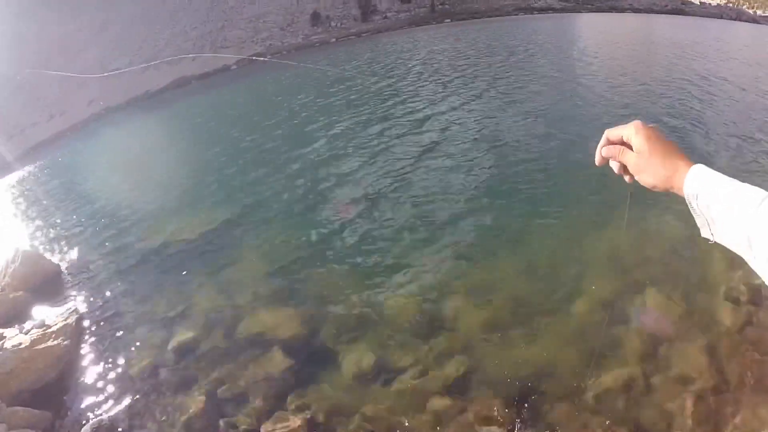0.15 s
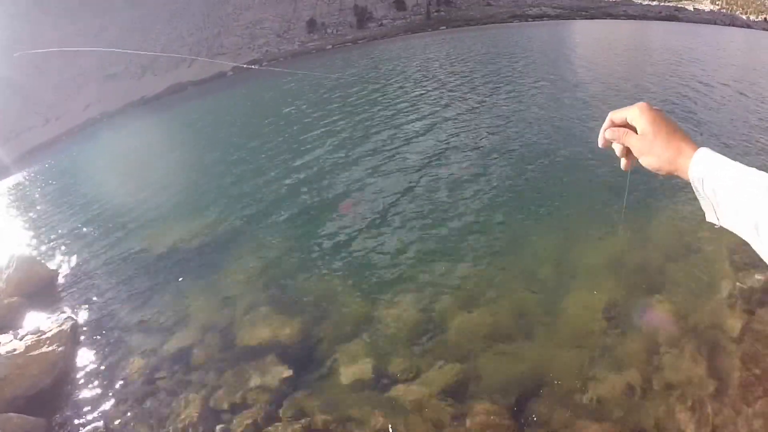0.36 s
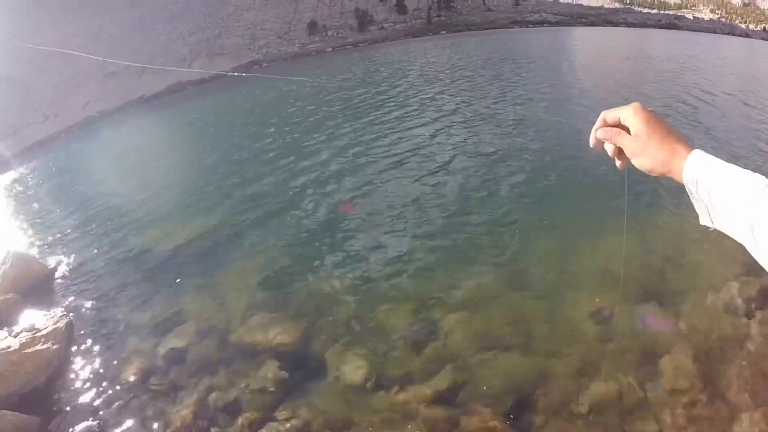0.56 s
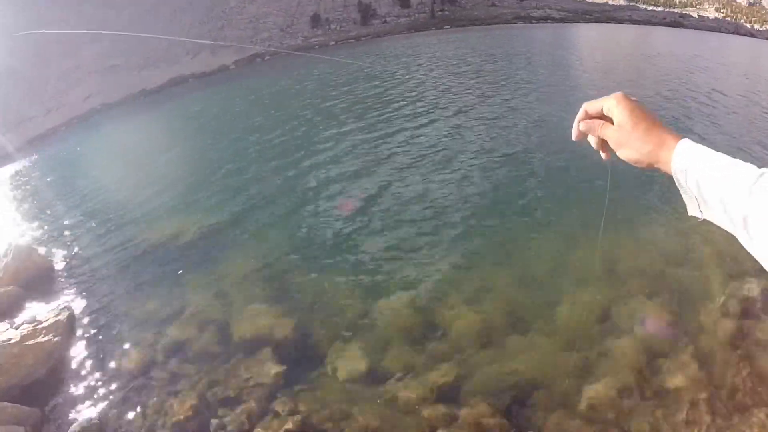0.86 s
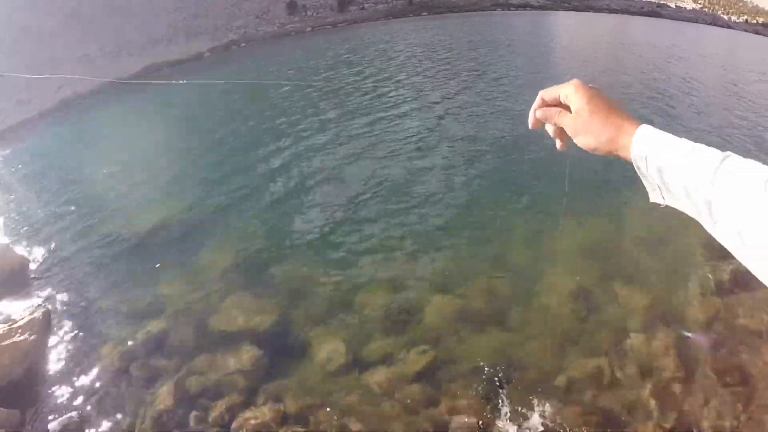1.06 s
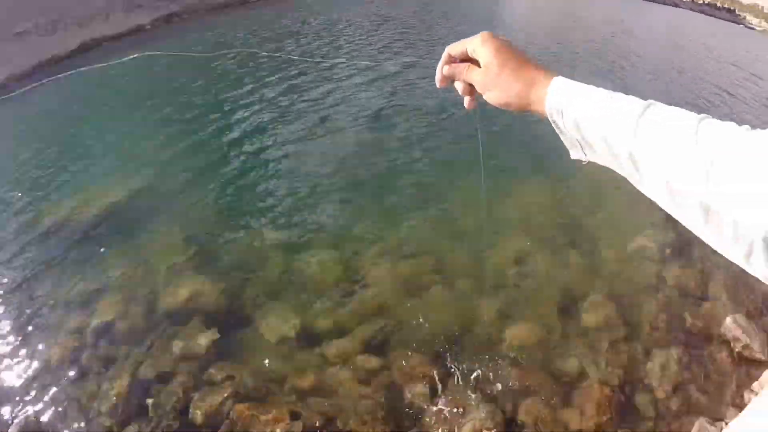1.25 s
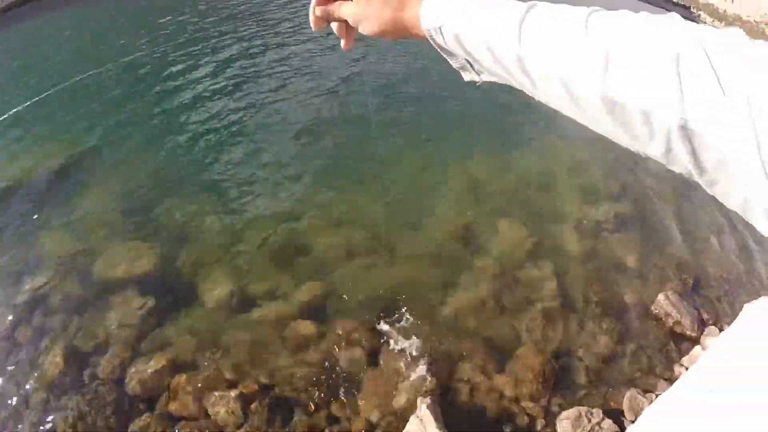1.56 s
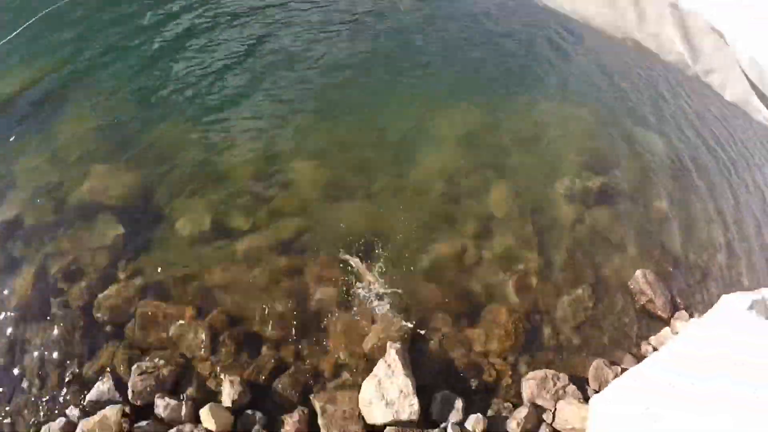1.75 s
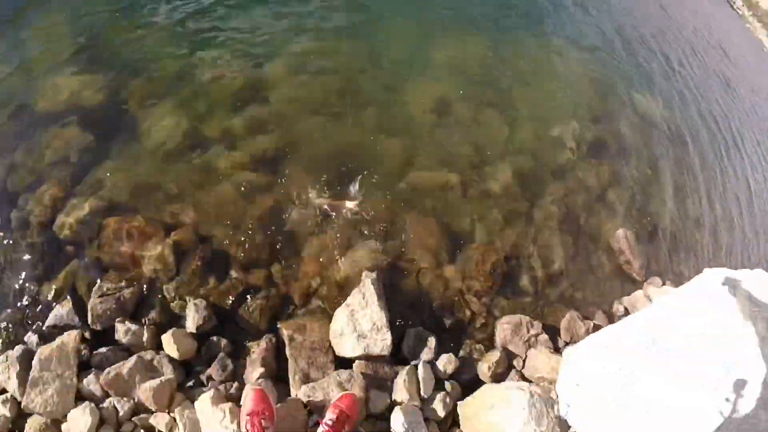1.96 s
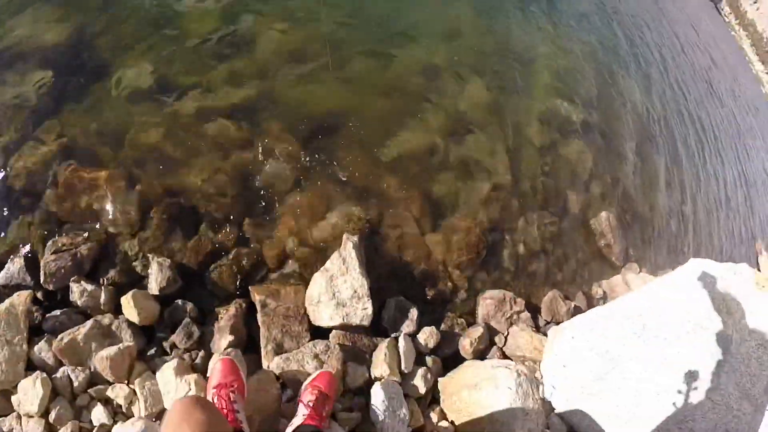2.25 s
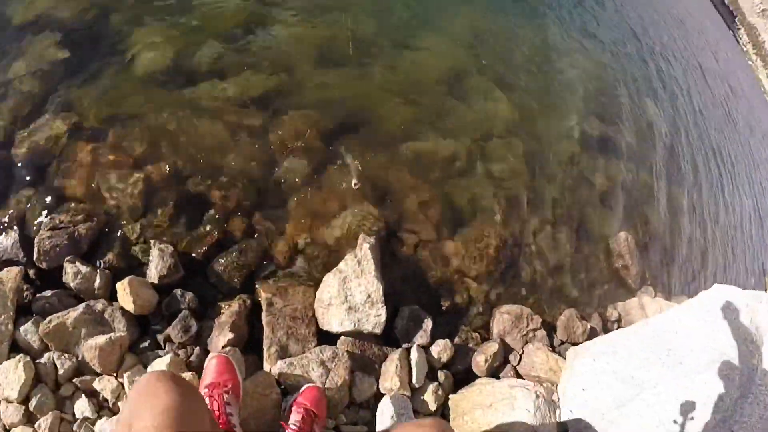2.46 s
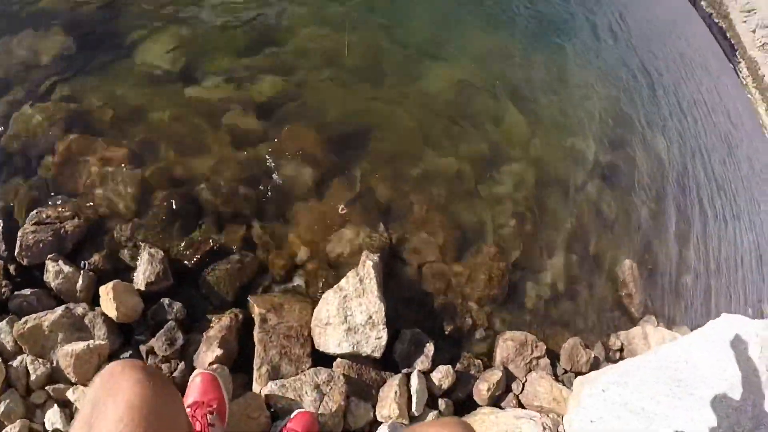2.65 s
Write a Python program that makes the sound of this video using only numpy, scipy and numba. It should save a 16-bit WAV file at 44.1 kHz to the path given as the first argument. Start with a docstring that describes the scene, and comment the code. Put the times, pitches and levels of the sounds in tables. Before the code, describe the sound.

A hooked fish thrashes in stony lake shallows. Until about 0.9 s, faint sloshing mixes with buzzing and small ticks from the camera housing. A burst of spray comes near 1 s, then sharp wet slaps cluster at 1.5-1.7 s, another at 1.9 s with low bubble gulps to 2.0 s. Smaller splashes and plops follow from 2.3 to 2.75 s. Gusty wind rumbles low on the microphone.

```python
"""A hooked fish thrashes in stony shallows a metre or two below a small camera with one microphone.
Slaps are ragged bursts of noise with a strong note each; bubbles are fading, gliding tones.
Spray and a wash of water mix noise with thousands of tiny droplet tones.
Behind them wind rumbles on the camera's port as filtered noise, and the housing buzzes and ticks
as rough noise through a few resonances."""
import sys
import numpy as np
from scipy import signal
from scipy.fft import rfft, irfft
from scipy.io import wavfile
from scipy.ndimage import uniform_filter1d
from numba import njit

SR = 44100
rng = np.random.default_rng(int(sys.argv[2]) if len(sys.argv) > 2 else 0)


def generate_wav(signal):
    """Clip the signal to [-1, 1] and save it as 16-bit WAV at the path in sys.argv[1]."""
    frames = np.transpose(np.atleast_2d(signal))
    scaled = np.clip(frames, -1, 1) * 32767
    pcm = np.round(scaled).astype(np.int16)
    wavfile.write(sys.argv[1], SR, pcm)


def magnitude_from_level(level_db):
    """Linear magnitude for a level in decibels (20 dB per decade)."""
    exponent = np.asarray(level_db, float) / 20
    return 10 ** exponent


N = 123479  # length in samples
T = np.arange(N) / SR  # time of every sample in seconds
F = np.arange(8193) * SR / 16384 + 1  # frequencies in Hz at which filters are drawn

# The changing strength of buzz, spray and wash over the whole scene;
# the shares of buzz and spray are set apart from it.
# Each row: time in seconds, treble level in dB, level of the middle relative to the treble in dB.
WATER_LEVELS = [(0, -54.5, 10.5), (0.12, -58.5, 4), (0.21, -59.5, 1), (0.33, -56.5, 6), (0.4, -47.5, 1.5),
                (0.5, -56, 8), (0.6, -59.5, 3.5), (0.83, -52, 4), (0.96, -41, -11.5), (1.04, -50.5, -12),
                (1.11, -44, -4), (1.19, -53, 1.5), (1.36, -56.5, -5.5), (1.53, -47, 5), (1.6, -45.5, 1),
                (1.72, -49.5, -7), (1.94, -46.5, -3), (2.13, -58, 3), (2.24, -57, -2), (2.34, -45.5, 11.5),
                (2.49, -46.5, 1), (2.515, -51.5, -3.5), (2.635, -56.5, 0.5), (2.67, -54, 9.5),
                (2.8, -58.5, 6.5)]
# The tone colour of spray. Each row: frequency in Hz, relative level in dB per Hz.
SPRAY_COLOUR = [(650, -68), (1100, -4), (2120, -1), (3140, -5.5), (3700, -2.5), (4270, -7), (5250, -7),
                (10500, -32), (15000, -20.5)]
# The spray takes over from the buzz as the fish breaks the surface: start and end in seconds.
SURFACING = 0.82, 1.29


def curve(rows, column):
    """Reads one column of a table at every sample, with straight lines between the rows."""
    table = np.array(rows, float)
    return np.interp(T, table[:, 0], table[:, column])


def unit(x):
    """Scales a sound to rms 1."""
    return x / np.sqrt(np.mean(x ** 2))


def colour(x, gain):
    """Filters a sound with the gain drawn over F, without any sound ahead of its cause."""
    cepstrum = irfft(np.log(gain + 1e-7))
    half = len(cepstrum) // 2
    # folding the second half onto the first gives the filter with the least delay
    cepstrum[1:half] *= 2
    cepstrum[half + 1:] = 0
    response = irfft(np.exp(rfft(cepstrum)))[:half]
    return signal.fftconvolve(x, response)[:N]


def shape(points):
    """Gain over F of a spectrum given as rows of Hz and dB."""
    table = np.array(points, float)
    return magnitude_from_level(np.interp(np.log(F), np.log(table[:, 0]), table[:, 1], left=-90, right=-90))


def peak(hz, width):
    """Gain over F of one resonance, with its width in Hz."""
    return 1 / np.sqrt(1 + ((F ** 2 - hz ** 2) / (F * width)) ** 2)


def walk(rate):
    """A wandering random level of rms 1: new values at this rate in Hz, smoothed twice."""
    hold = int(SR / rate)
    steps = rng.standard_normal(2000)[np.arange(N) // hold]
    return unit(uniform_filter1d(uniform_filter1d(steps, hold), hold))


def burst(peak_s, t60, rise_s):
    """Loudness of one hit: a quick rise to 1 at peak_s, then a fade by 60 dB in t60 seconds."""
    since = np.maximum(T - peak_s + rise_s, 0)
    rise = np.minimum(since / rise_s, 1) ** 2
    fade = np.exp(-np.log(1000) * np.maximum(since - rise_s, 0) / max(t60, .004))
    return rise * fade


@njit
def ring(at, hz, cycles, size, glide):
    """Sum of short fading tones that glide upward."""
    out = np.zeros(N)
    for k in range(len(at)):
        n = cycles[k] * SR / hz[k]
        step, phase = 2 * np.pi * hz[k] / SR, 0.
        for j in range(min(int(3 * n), N - at[k])):
            phase += step * (1 + glide * j / n)
            out[at[k] + j] += size[k] * np.sin(phase) * np.exp(-2 * j / n) * min(j * 5 / n, 1.)
    return out


def drops(lo_hz, hi_hz, cycles, spread_db, count):
    """Tiny ringing tones of random time, pitch, size and length; together about as even as white noise."""
    when, pitch, luck, length = rng.random((count, 4)).T
    hz = lo_hz * (hi_hz / lo_hz) ** pitch
    size = hz * magnitude_from_level(-spread_db * np.log(luck + .015))
    return unit(ring((when * N).astype(np.int64), hz, cycles * (.5 + length), size, 0.15))


def hits(rows, broad, rise_s, t60, q, note_db):
    """Short bursts of a broad noise, each with one strong note made by a narrow filter."""
    note, out = rng.standard_normal(N), np.zeros(N)
    for start_s, db, hz in rows:
        span = slice(max(int((start_s - .02) * SR), 0), int((start_s + .15) * SR))
        env = burst(start_s + rise_s, t60, rise_s)[span]
        tone = unit(signal.lfilter(*signal.iirpeak(hz, q, fs=SR), note[span]))
        hit = env * (broad[span] + magnitude_from_level(note_db) * tone)
        even = np.sqrt(np.sum(env ** 2) / np.sum(hit ** 2))
        out[span] += magnitude_from_level(db - 9) * hit * even  # 9 dB: noise peaks stand above its rms
    return out


def wind():
    """Eddies on the port: a deep and a fluttering upper rumble, both held close to the gust's strength."""
    # The gusts. Each row: time in seconds, level of the deep rumble in dB,
    # level of the upper rumble relative to the deep one in dB.
    gusts = [(0, -44.5, 7.5), (0.15, -43.5, -20.5), (0.35, -36, -9.5), (0.53, -30, -10.5), (0.68, -36, 0),
             (0.83, -40, -3.5), (0.96, -26, -2), (1.05, -35.5, -0.3), (1.2, -29, -10.5), (1.6, -33, -2),
             (1.88, -31.5, 2), (2.1, -35, -3), (2.33, -28.5, 2.5), (2.45, -34, -4), (2.56, -39.5, 6.5),
             (2.62, -56.5, 12.5), (2.68, -37.5, -11.5), (2.8, -50.5, 19)]
    # Tone colours of the two rumbles. Each row: frequency in Hz, relative level in dB per Hz.
    deep_colour = [(11, -19), (18, 6), (43, 6), (63, 8), (110, -2.5), (140, -14.5), (240, -120)]
    # Each row: frequency in Hz, relative level in dB per Hz.
    upper_colour = [(53, -22), (105, 0), (194, -5), (281, -12.5), (520, -24), (680, -38), (1140, -120)]

    def even_out(x):
        """Removes slow swells, so that the gusts alone set the level."""
        return unit(x / np.sqrt(uniform_filter1d(x ** 2, SR // 8)))

    deep = even_out(colour(rng.standard_normal(N), shape(deep_colour)))
    flutter = rng.standard_normal(N) * magnitude_from_level(3.1 * walk(29.66))
    upper = even_out(colour(flutter, shape(upper_colour)))
    return magnitude_from_level(curve(gusts, 1)) * (deep + magnitude_from_level(curve(gusts, 2)) * upper)


def housing():
    """Loose parts buzz in bursts and tick; all ring the same resonances."""
    # Resonances of the housing. Each row: frequency in Hz, width in Hz, relative level in dB.
    resonances = [(1420, 1250, 4.5), (3064, 330, 6), (4270, 430, 3.5), (5740, 270, 2), (7700, 3700, -18)]
    # Ticks. Each row: start in seconds, rough peak level in dB, strongest frequency in Hz.
    tick_list = [(0.0637, -28.5, 5420), (0.147, -41, 1260), (0.2372, -32, 1440), (0.2595, -32, 1324),
                 (0.2915, -36, 1390), (0.336, -33.5, 1270), (0.365, -31, 1340), (0.3863, -28, 1170),
                 (0.41, -29.5, 4150), (0.683, -32.5, 5580), (0.697, -28.5, 1060), (0.747, -36, 4140),
                 (0.815, -34, 3320), (0.8564, -23.5, 4350), (0.8745, -36, 1470), (0.9657, -27.5, 3200),
                 (1.0007, -31.5, 2630), (1.092, -31, 3220), (1.1205, -31.5, 3080), (1.1488, -34.5, 4900)]
    gain = sum(magnitude_from_level(db) * peak(hz, width) ** 2 for hz, width, db in resonances)
    rattle = rng.standard_normal(N) * magnitude_from_level(1.0 * walk(39.6) + 8.1 * walk(170))
    grain = rattle + 0.83 * drops(970, 8660, 14.0, 5.1, count=4000)
    buzz = unit(colour(grain, gain)) * magnitude_from_level(curve(WATER_LEVELS, 1))
    buzz = buzz * np.interp(T, SURFACING, [.9, 0])
    broad = unit(colour(rng.standard_normal(N), gain))
    ticks = hits(tick_list, broad, rise_s=0.0027, t60=0.036, q=27.0, note_db=0.038)
    return buzz + ticks


def wash():
    """Fine spray and droplets above, sloshing and small bubbles in the middle; a faint steady background hiss."""
    mist = .8 * rng.standard_normal(N) * magnitude_from_level(3.5 * walk(90))
    fine = mist + drops(1050, 11100, 7.5, 3.8, count=8000)
    spray = unit(colour(fine, shape(SPRAY_COLOUR)))
    spray = spray * np.interp(T, SURFACING, magnitude_from_level(np.array([-12., -2.5])))
    swill = rng.standard_normal(N) * magnitude_from_level(3 * walk(80))
    slosh = swill + drops(336.7, 4095, 6.44, 5.76, count=3000)
    low_cut = F / np.hypot(F, 400)
    slosh = unit(colour(slosh, peak(420, 956) ** 2 * low_cut))
    hiss = unit(colour(rng.standard_normal(N), peak(3500, 8000))) * magnitude_from_level(-74.0)
    return magnitude_from_level(curve(WATER_LEVELS, 1)) * (spray + magnitude_from_level(curve(WATER_LEVELS, 2)) * slosh) + hiss


def bubbles():
    """Trapped air rings as a fading, gliding tone."""
    # Each row: time of the peak in seconds, level in dB, starting pitch in Hz,
    # time to fade by 60 dB in seconds, glide in octaves per second.
    bubble_list = [(0.008, -30.5, 650, 0.031, 2.5), (0.494, -32, 503, 0.029, 16),
                   (0.794, -30, 478, 0.023, -16), (1.33, -35.5, 600, 0.031, -19),
                   (1.094, -25, 456, 0.018, 28), (1.229, -32.5, 665.5, 0.039, -11),
                   (1.287, -40.5, 715, 0.066, 8), (1.532, -25.5, 507, 0.037, -1),
                   (1.627, -24.5, 364, 0.13, 6.5), (1.914, -19.5, 298.2, 0.15, -1),
                   (2.023, -26, 236.3, 0.24, -4.5), (2.632, -31, 215, 0.14, 6),
                   (2.691, -24.5, 300, 0.051, -8)]
    out = np.zeros(N)
    for peak_s, db, hz, t60, glide in bubble_list:
        pitch = hz * 2 ** (glide * np.clip(T - peak_s, 0, t60))
        pitch = pitch * (1 + 0.04824 * walk(90))  # a slight wobble
        tone = np.sin(2 * np.pi * np.cumsum(pitch) / SR)
        out += magnitude_from_level(db) * burst(peak_s, t60, rise_s=0.005) * tone
    return out


def slaps():
    """Slaps and drops: ragged bursts of spray with one strong cavity note."""
    # Each row: start in seconds, rough peak level in dB, strongest frequency in Hz.
    slap_list = [(0.002, -29, 1460), (1.2235, -33.5, 2540), (1.473, -27, 1860), (1.5126, -20, 1930),
                 (1.5237, -18, 2480), (1.5312, -15.5, 3720), (1.5648, -26, 1980), (1.6173, -27, 2070),
                 (1.6256, -24, 1840), (1.6661, -26, 3680), (1.7725, -25, 2850), (1.808, -29.5, 2570),
                 (1.857, -38, 1170), (1.9031, -20.5, 3950), (2.277, -31, 1300), (2.336, -29.5, 2220),
                 (2.4803, -27.5, 1960), (2.585, -26.5, 1684), (2.6517, -29.5, 1110), (2.704, -47, 2020),
                 (2.741, -31.5, 1090), (2.761, -39, 5900)]
    ragged = rng.standard_normal(N) * magnitude_from_level(4 * walk(400))
    splash = ragged + drops(1294, 11500, 4.3, 8.5, count=9000)
    gain = shape(SPRAY_COLOUR) * peak(3500, 10000) + magnitude_from_level(4.5) * peak(700, 610) ** 2
    broad = unit(colour(splash, gain))
    return hits(slap_list, broad, rise_s=0.0037, t60=0.044, q=13.3, note_db=1.0)


def scene():
    """One microphone feeds both channels."""
    mono = wind() + housing() + wash() + bubbles() + slaps()
    return np.tile(mono, (2, 1))


def top_cut(x):
    """Nothing passes above the cut-off."""
    return signal.sosfilt(signal.butter(12, 15570, fs=SR, output="sos"), x)


def record(dry):
    """The microphone rolls off at the very top, above 13500 Hz."""
    roll_off = signal.butter(4, 13500, fs=SR, output="sos")
    mix = signal.sosfilt(roll_off, dry)
    return top_cut(mix)


dry = scene()
out = record(dry)
generate_wav(out)
```